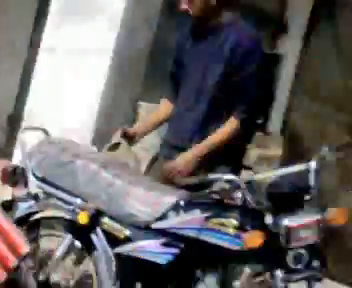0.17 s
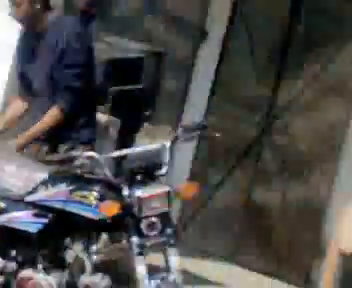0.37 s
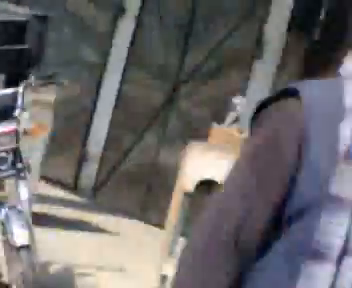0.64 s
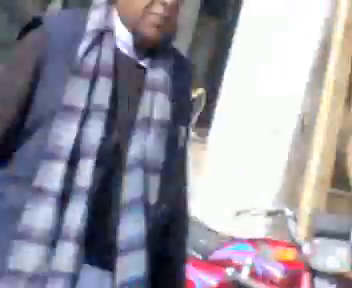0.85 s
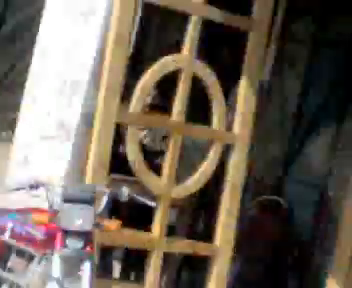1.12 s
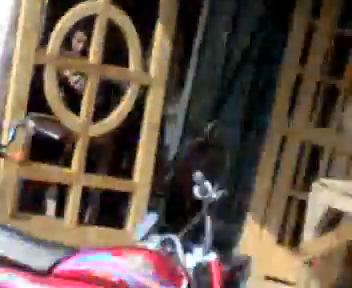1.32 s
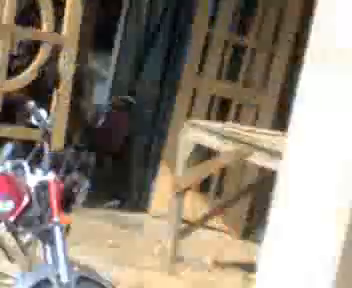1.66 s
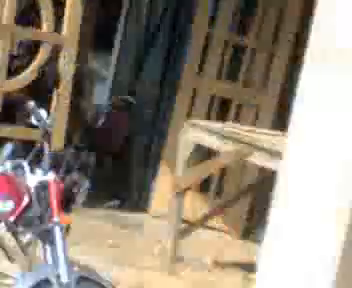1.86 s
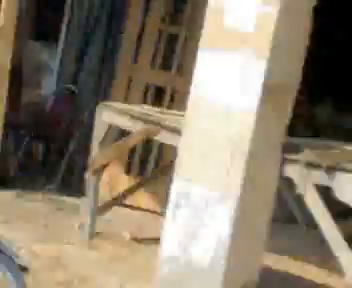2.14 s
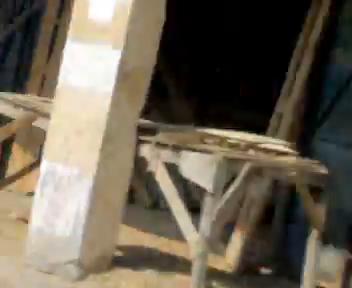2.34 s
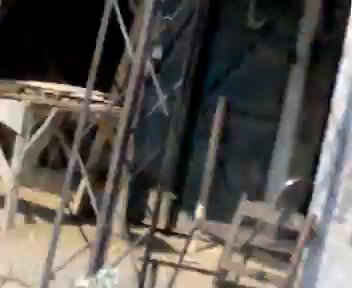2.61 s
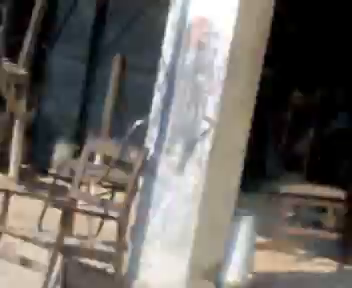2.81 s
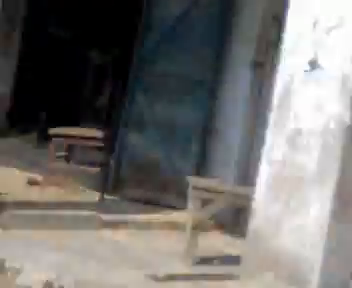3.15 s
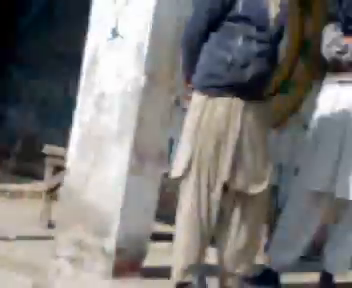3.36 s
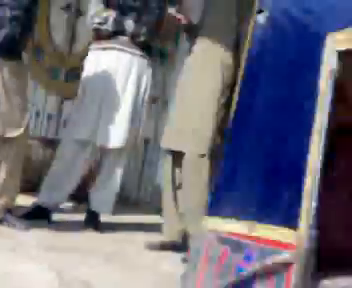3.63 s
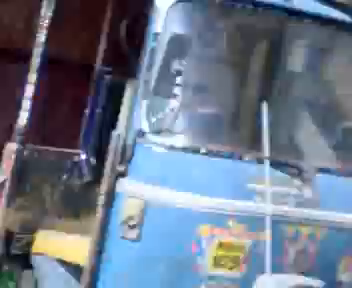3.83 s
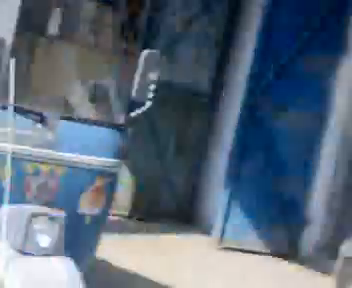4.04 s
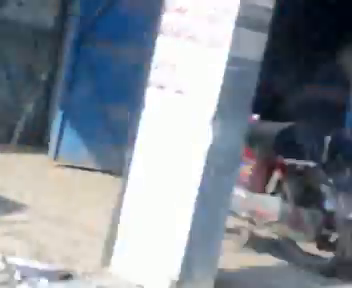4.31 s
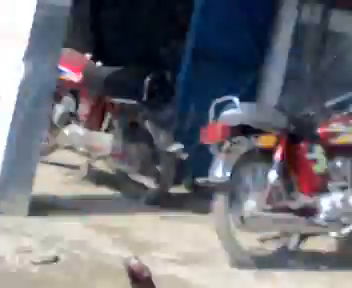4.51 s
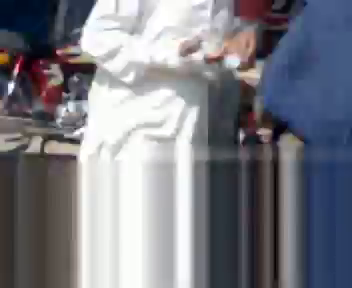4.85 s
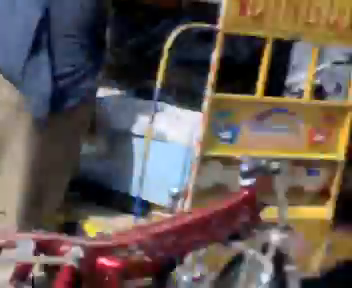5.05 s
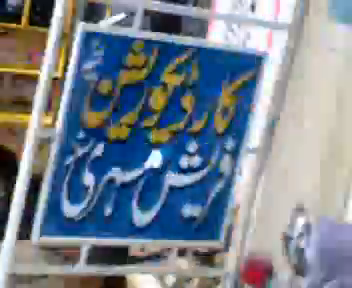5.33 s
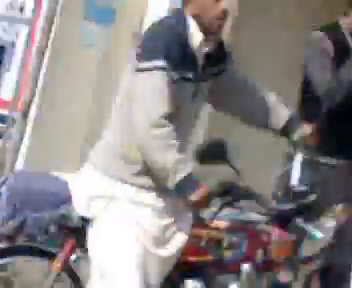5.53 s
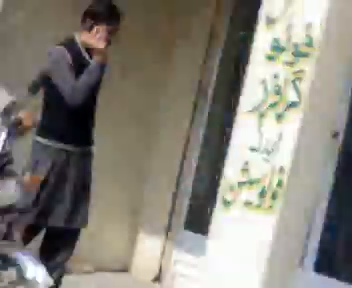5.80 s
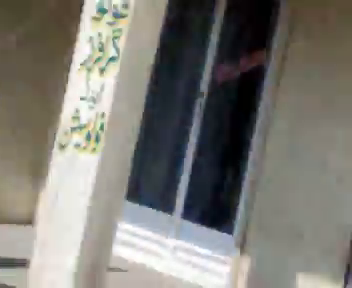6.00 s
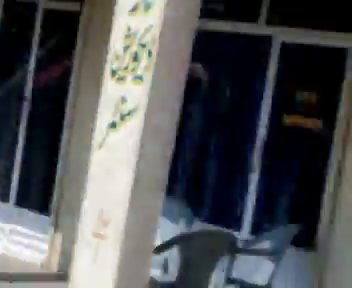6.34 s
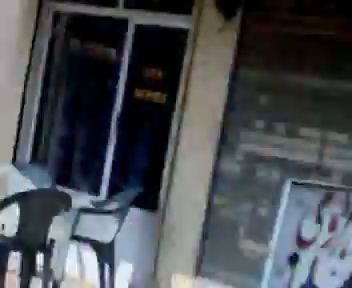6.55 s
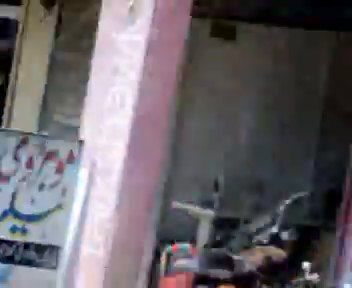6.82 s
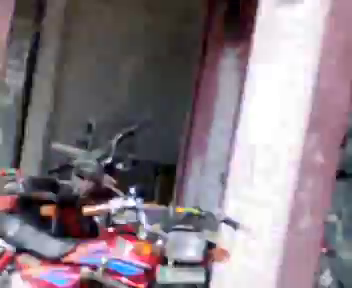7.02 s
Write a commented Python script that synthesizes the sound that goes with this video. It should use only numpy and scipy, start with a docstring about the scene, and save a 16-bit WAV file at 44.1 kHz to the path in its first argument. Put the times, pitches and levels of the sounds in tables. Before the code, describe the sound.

From the start, wind buffets the microphone with a low, uneven rumble, heard from aboard a small vehicle moving along a street of shops. Loose fittings tick faintly right at the beginning and again between about 1.4 and 1.8 seconds. From around 0.7 seconds an engine hum and a thin gear whine come up and climb slowly in pitch, while the tyre rush and body drone grow. At 3.5 seconds the horn gives one loud, buzzy blast lasting until about 4.1 seconds. It throbs, overloads the microphone a little and leaves a short echo off the shop fronts. This is the loudest sound by far. The wind, tyres and rising engine carry on, with a faint ringing tick near 5.6 seconds. At about 6.8 seconds there is another small tick as the engine eases off, dropping in pitch and level, while the wind continues to the end just after 7 seconds.

```python
"""A pair of electric disc horns gives one loud blast during a ride in a small vehicle.
Tuned a few hertz apart, the horns throb, echo off the shop fronts and overload the microphone.
All along, air buffets the microphone, tyres rush and loose fittings tick now and then.
The vehicle slowly gathers speed, then eases off; its engine hum and gear whine swell
as they glide through resonances, the pitches at which the cabin and gearbox like to ring."""
import sys
import numpy as np
from scipy import signal
from scipy.fft import rfft, irfft, next_fast_len
from scipy.io import wavfile
from scipy.ndimage import uniform_filter1d, minimum_filter1d

SR = 44100
rng = np.random.default_rng(int(sys.argv[2]) if len(sys.argv) > 2 else 0)


def master(y):
    """Save y as 16-bit WAV."""
    cut = np.clip(np.atleast_2d(y).T, -1, 1)
    pcm = np.round(cut * 32767)  # scale
    wavfile.write(sys.argv[1], SR, pcm.astype(np.int16))


N = 315756

# air on the microphone: t/s, buffeting/dB, boom/dB
WIND_LEVELS = [(0.0, -23, -23.5), (0.26, -18, -24.5), (0.52, -23.5, -30), (0.7, -22, -19.5),
               (0.86, -20, -28), (1.04, -22.5, -23), (2.13, -18.5, -20), (2.35, -19.5, -21),
               (2.49, -37, -21.5), (2.59, -15, -22.5), (2.75, -23, -20.5), (4.07, -25, -25),
               (4.4, -26.5, -20.5), (6.48, -24, -18.5), (6.76, -22, -15), (6.82, -42, -21),
               (6.88, -22.5, -17), (7.16, -22, -24.5)]
# road noise: t/s, body drone/dB, tyre rush/dB, hiss/dB
ROAD_LEVELS = [(0, -40, -44, -90), (.48, -42.5, -43, -65), (.68, -37, -39.5, -64.5),
               (1.1, -39.5, -38.5, -58.5), (2.2, -33, -35, -56.5), (3.2, -30.5, -34.5, -55.5),
               (4.3, -33.5, -37, -59.5), (4.7, -30, -34.5, -58), (6, -33, -32, -56),
               (6.85, -31, -32.5, -57.5), (7.16, -35, -36, -66.5)]
# how each noise is spread from low to high pitch: f/Hz, level/dB
BUFFET_SPECTRUM = [(12, -14), (22, -3), (30, 0.5), (41, 0.5), (52, -5.5), (62, -6.5), (90, -37.5)]
BOOM_SPECTRUM = [(42, -12.5), (58, 1), (68, 1), (85, -4.5), (100, -3.5), (113, 0.5), (135, -19),
                 (200, -28.5), (400, -52)]
DRONE_SPECTRUM = [(90, -17), (150, 2), (220, -7), (280, -2), (340, -2.5), (400, -12.5), (500, -16),
                  (900, -44)]
TYRE_SPECTRUM = [(250, 2.5), (480, -9), (640, -2.5), (790, 1.5), (950, -1), (1200, -2.5), (1500, -4),
                 (1750, -7), (1920, -9), (2100, -12.5), (2600, -17.5), (3300, -34), (5000, -45)]
HISS_SPECTRUM = [(2000, -15.5), (3200, 6), (3900, 1), (4700, -4), (5200, 0), (5700, -5.5), (6400, -1.5),
                 (7300, -14.5)]
RASP_SPECTRUM = [(600, -19.5), (2100, -4.5), (3300, -6.5), (3800, -27), (6000, -17.5), (7200, -21)]
# singing panels: f/Hz, level against the tyres/dB, shaft speed that shakes it most/Hz, half width/Hz
PANEL_NOTES = [(1225, -13.5, 73, 53), (1884, -9.5, 59, 14.3)]
# how fast the engine shaft turns: t/s, speed/Hz
SHAFT_SPEED = [(0, 39.1), (1, 44.3), (1.35, 46.3), (2.6, 60.05), (3.35, 67.4), (4.3, 70.6), (4.6, 72.4),
               (5.3, 78.1), (6.4, 87.6), (6.72, 89), (7.16, 80.1)]
# how hard the gears work: t/s, load/dB
GEAR_LOAD = [(0, -36), (.7, -3), (1.3, 0), (2.3, -1), (2.9, 1), (3.2, 4), (4.4, 1), (5.15, 1.5), (5.4, -5),
             (5.65, 0.5), (6.7, 1.5), (6.85, -17), (7.16, -16.5)]
# the hum and whine pitches, as multiples of the shaft speed
HUM_MULTIPLES, WHINE_MULTIPLES = (2, 3, 3.3, 4, 6), (9, 13.1, 18)
# each hum tone before the cabin and load shape it: level/dB
HUM_LEVELS = (-27, -27, -35, -35.5, -37)
# each gear pair whines most at one speed: level/dB, shaft speed/Hz, half width/Hz
GEAR_PAIRS = [(-35.5, 78.6, 12.1), (-37, 99, 29.4), (-45, 55, 14)]
# cabin and gearbox resonances: f/Hz, half width/Hz, gain/dB
CABIN_RESONANCES = [(104, 14, -0.5), (158, 10, -2.5), (195.1, 4.5, 2), (257.7, 5, -9), (287, 12.1, 1)]
GEARBOX_RESONANCES = [(818.6, 20, 8)]
# loose fittings: t/s, level/dB, fade time/s, f/Hz, width/Hz
FITTING_TICKS = [(0.054, -58, .025, 5500, 2700), (0.055, -58, 0.011, 4560, 200),
                 (.058, -40, 0.022, 1600, 900), (0.227, -63, .01, 5000, 2500),
                 (1.445, -51, .008, 3960, 2000), (1.753, -47.5, 0.0086, 4200, 2100),
                 (1.82, -54, .009, 4800, 2400), (5.577, -54.5, 0.074, 3800, 150),
                 (6.85, -45.5, .013, 6900, 3400)]
# the tones in a horn's buzz: multiple of its pitch, upper horn/dB, lower horn/dB
HORN_HARMONICS = [(1, -12, -15.5), (2, -25.5, -33), (3, -33, -30), (4, -33.5, -26), (5, -33, -34.5),
                  (6, -31.5, -26), (7, -19, -23), (8, -28.5, -29), (9, -42, -33.5), (10, -35.5, -37),
                  (11, -55.5, -48.5), (14, -50.5, -48.5), (15, -38.5, -42), (16, -46, -55),
                  (18, -47, -41.5), (20, -45.5, -53), (21, -48.5, -51), (22, -46, -53)]
# the disc flexes as its striker starts and stops: t/s, length/s, boost of the sixth harmonic/dB
DISC_FLEXES = [(3.539, 0.028, 11.5), (4.102, 0.0086, 7)]
# the steel discs' own notes: f/Hz, width/Hz, level/dB, time to fade by 60 dB/s
DISC_NOTES = [(2970, 120, -31.5, 0.41), (3380, 30, -36.5, 0.65)]


def undb(db):
    """Turn decibels into a factor to multiply by."""
    return 10 ** (np.asarray(db) / 20)


def unit(x):
    """Scale a signal to an average (rms) strength of 1."""
    return x / np.sqrt(np.mean(x ** 2) + 1e-18)


def curves(rows):
    """Join a timed table's points with straight lines, one curve per column."""
    times, *columns = np.transpose(rows)
    return [np.interp(np.arange(N) / SR, times, column) for column in columns]


def wander(rate):
    """A smooth random wobble of size about 1 that picks a new value `rate` times a second."""
    step = max(int(SR / rate), 2)
    held = np.repeat(rng.standard_normal(N // step + 2), step)[rng.integers(step):][:N]
    return np.sqrt(2) * uniform_filter1d(uniform_filter1d(held, step), step)


def noise(spectrum):
    """Noise of strength 1, shaped by (f/Hz, level/dB) points and fading beyond them."""
    hz, db = np.transpose(spectrum)
    n = next_fast_len(N, real=True)
    f = np.arange(n // 2 + 1) * SR / n + 1e-3
    edges = np.minimum(f / hz[0], 1) * np.minimum(hz[-1] / f, 1)
    gain = undb(np.interp(np.log(f), np.log(hz), db)) * edges
    return unit(irfft(rfft(rng.standard_normal(n)) * gain, n)[:N])


def noise_band(hz, width_hz):
    """Noise of strength 1 around one pitch; the narrower it is, the more it rings."""
    b, a = signal.iirpeak(hz, hz / width_hz, fs=SR)
    return unit(signal.lfilter(b, a, signal.lfilter(b, a, rng.standard_normal(N))))


def rough_tone(turns, rough=.3):
    """A tone with one wave per turn, shaky in level and timing."""
    angle = 2 * np.pi * turns
    return unit((1 + rough * wander(14)) * np.cos(angle) + rough * wander(14) * np.sin(angle))


def swell(hz, centre_hz, half_width_hz, steepness=2):
    """One resonance: gain 1 at its centre, less to either side."""
    return 1 / (1 + np.abs((hz - centre_hz) / half_width_hz) ** steepness)


def response(hz, resonances, floor_db):
    """How strongly a body with resonances answers when shaken at hz."""
    return undb(floor_db) + sum(undb(db) * swell(hz, centre, width) for centre, width, db in resonances)


def linger(drive, fade_s):
    """Build up and die away like a ringing body, losing 60 dB in fade_s."""
    keep = np.exp(-np.log(1000) / (fade_s * SR))
    return signal.lfilter([1 - keep], [1, -keep], drive + 1e-18)


def wind():
    """Swirls of air buffet the microphone and set the air under the roof booming."""
    out = np.zeros(N)
    for db, spectrum in zip(curves(WIND_LEVELS), (BUFFET_SPECTRUM, BOOM_SPECTRUM)):
        swirls = noise(spectrum)
        # the airflow is steady, so the swirls keep a fairly even strength
        strength = np.sqrt(uniform_filter1d(swirls ** 2, size=SR // 8) + 1e-9)
        out += undb(db) * swirls / strength
    return out


def road(shaft_hz, turns):
    """The body drones, tyres rush and hiss, and two panels sing when the speed suits them."""
    drone_db, tyre_db, hiss_db = curves(ROAD_LEVELS)
    # every engine firing pushes a little extra noise through the body
    firing = 1 + 0.076 * np.cos(2 * np.pi * turns)
    drone = undb(drone_db + 1.3 * wander(12)) * noise(DRONE_SPECTRUM)
    tyres = undb(tyre_db + .5 * wander(20)) * noise(TYRE_SPECTRUM)
    hiss = undb(hiss_db + 0.55 * wander(21)) * noise(HISS_SPECTRUM)
    panels = np.zeros(N)
    for hz, db, best_speed, width in PANEL_NOTES:
        shaking = swell(shaft_hz, best_speed, width, steepness=4)
        panels += undb(tyre_db + db) * shaking * noise_band(hz, width_hz=38)
    return firing * (drone + tyres + hiss) + panels


def engine(shaft_hz, turns):
    """One shaft drives a hum through the cabin and a whine through the gearbox."""
    load_db, = curves(GEAR_LOAD)
    hum, whine = np.zeros(N), np.zeros(N)
    for k, db in zip(HUM_MULTIPLES, HUM_LEVELS):
        cabin = response(k * shaft_hz, CABIN_RESONANCES, floor_db=-23)
        hum += undb(db) * cabin * rough_tone(k * turns)
    for k, (db, best_speed, width) in zip(WHINE_MULTIPLES, GEAR_PAIRS):
        strength = undb(db + 2 * wander(5)) * swell(shaft_hz, best_speed, width)
        gearbox = response(k * shaft_hz, GEARBOX_RESONANCES, floor_db=-1)
        whine += strength * gearbox * rough_tone(k * turns)
    # the hum follows the load less than the whine does
    return undb(0.44 * load_db) * hum + undb(load_db) * whine


def rattles():
    """Loose fittings give short ticks, dry or with a thin ring."""
    t, out = np.arange(N) / SR, np.zeros(N)
    for start, db, fade_s, hz, width in FITTING_TICKS:
        burst = (t >= start) * np.exp(-np.abs(t - start) / fade_s)
        out += undb(db) * burst * noise_band(hz, width)
    return out


def horn_button(t, press_s=3.504, release_s=4.09, pitch_hz=330):
    """One press: the pitch scoops up as the discs get going and droops as they stop."""
    held, let_go = np.maximum(t - press_s, 0), np.maximum(t - release_s, 0)
    scoop_hz = 24.34 * np.exp(-held / .015)
    droop_hz = 8 * np.minimum(let_go / .04, 1) ** 2
    drive = np.minimum(held / .0053, 1) * undb(-598.5 * let_go)  # snaps on, dies quickly
    return pitch_hz - scoop_hz - droop_hz, drive


def horns(apart_hz=4.52, in_step_s=3.57):
    """Two buzzing discs drift in and out of step; harmonic k throbs k times as fast."""
    t = np.arange(N) / SR
    hz, drive = horn_button(t)
    lead_turns = apart_hz * (t - in_step_s)
    # they share one power supply: when both pull at once, the pitch sags and they strike more softly
    sag = np.cos(2 * np.pi * lead_turns)
    upper_turns = np.cumsum(hz - 1.1 * sag + .5 * wander(45)) / SR
    flex = 1 + sum((undb(db) - 1) * np.exp(-((t - when) / length) ** 2)
                   for when, length, db in DISC_FLEXES)
    harmonic_gain = {6: flex, 7: undb(-2.2 * sag)}
    multiples, *levels = np.transpose(HORN_HARMONICS)
    buzz = np.zeros(N)
    for turns, harmonic_db in zip((upper_turns, upper_turns - lead_turns), levels):
        # each striker keeps slightly uneven time
        chatter = .0018 * wander(200) + .004 * wander(30) + .011 * wander(10)
        for k in range(1, 23):
            offset = rng.random() * (k > 1)
            # passing walls make the high tones fade in and out
            fading_db = min(.12 * (k - 1), 2.2) * wander(14)
            gain = undb(np.interp(k, multiples, harmonic_db) + fading_db) * harmonic_gain.get(k, 1)
            buzz += gain * np.sqrt(2) * np.sin(2 * np.pi * (k * (turns + chatter) + offset))
    # the electric contacts rasp once a cycle, and the steel discs ring on at their own notes
    contact = 1 + .9 * np.cos(2 * np.pi * upper_turns)
    rasp = undb(-33.5) * linger(drive, fade_s=.32) * contact * noise(RASP_SPECTRUM)
    ring = sum(undb(db) * linger(drive, fade_s) * noise_band(note, width)
               for note, width, db, fade_s in DISC_NOTES)
    return linger(drive, fade_s=.03) * buzz + rasp + ring


def street_echo(sound, fade_s=0.69, treble_fade_s=.22, echo_db=-17):
    """Shop fronts send back a short, blurred echo whose treble dies first."""
    t = np.arange(N) / SR
    body = noise([(200, -9), (600, -2), (2300, -13), (3400, -0.5), (3750, -13), (5000, -37.5)])
    treble = undb(-2) * noise([(3500, -12), (4200, 0), (7000, -1)])
    tail = body * undb(-60 * t / fade_s) + treble * undb(-60 * t / treble_fade_s)
    tail = (tail * (t > .012))[:SR]  # the echo starts 12 ms late
    tail /= np.abs(rfft(tail)[2000:3400]).mean()  # average gain of 1 from 2000 to 3400 Hz
    return sound + undb(echo_db) * signal.fftconvolve(sound, tail)[:N]


def scene():
    """The ride and the echoing horns meet at one microphone."""
    shaft_hz, = curves(SHAFT_SPEED)
    turns = np.cumsum(shaft_hz * (1 + .0018 * wander(9))) / SR
    ride = engine(shaft_hz, turns) + road(shaft_hz, turns) + wind() + rattles()
    return (ride + street_echo(horns()))[None]


def record(dry, limit=1.0, ceiling=0.66, top_hz=7200):
    """A limiter turns the loudest moments down, the peaks flatten, and the highest treble is cut."""
    peak = -minimum_filter1d(-np.abs(dry), size=900)
    gain = uniform_filter1d(limit / np.maximum(peak, limit), size=700)
    limited = dry * gain
    flattened = limited / (1 + (limited / ceiling) ** 8) ** (1 / 8)
    treble_cut = signal.ellip(10, .2, 80, top_hz, fs=SR, output="sos")
    return signal.sosfilt(treble_cut, flattened)


dry = scene()
out = record(dry)
master(out)
```